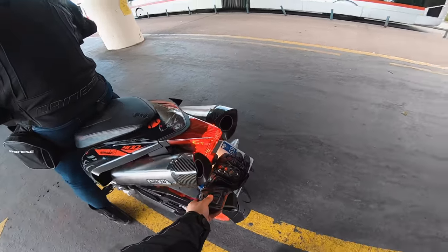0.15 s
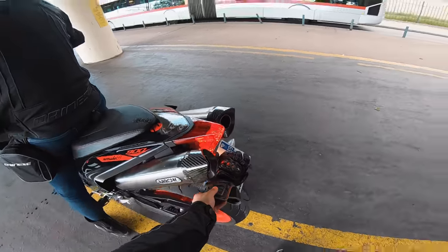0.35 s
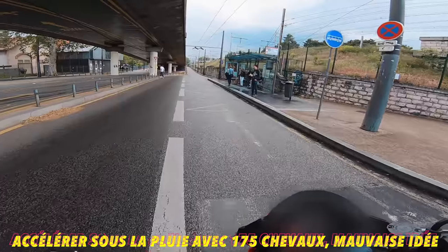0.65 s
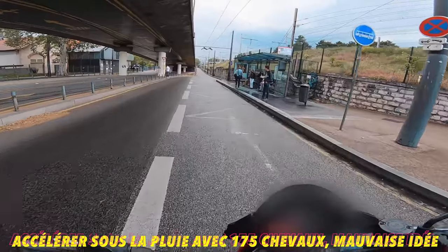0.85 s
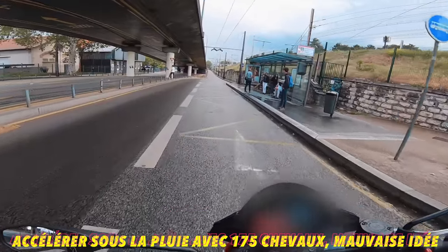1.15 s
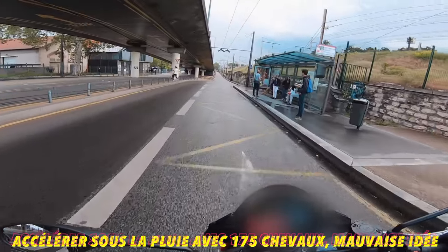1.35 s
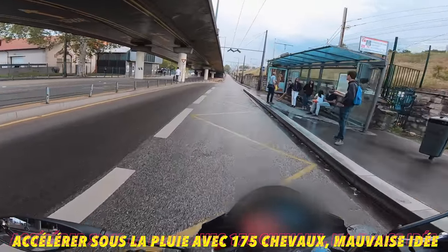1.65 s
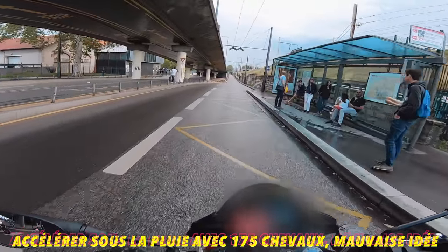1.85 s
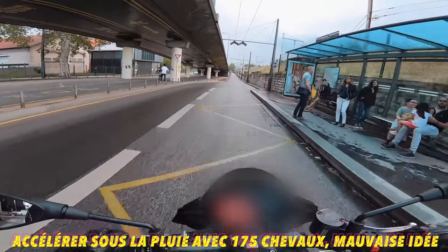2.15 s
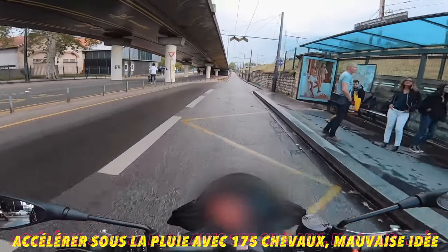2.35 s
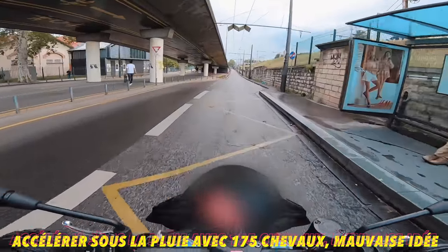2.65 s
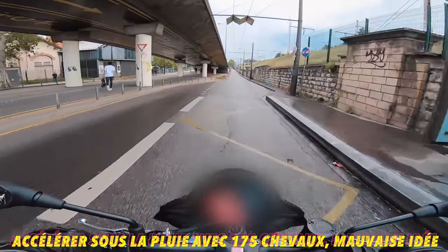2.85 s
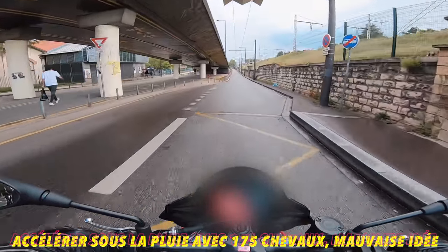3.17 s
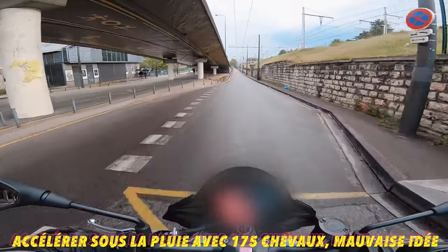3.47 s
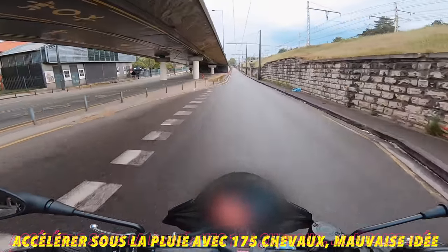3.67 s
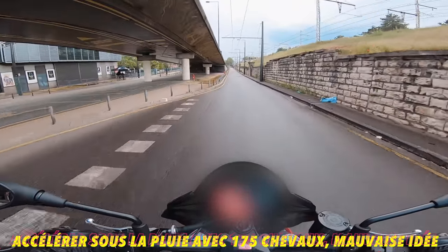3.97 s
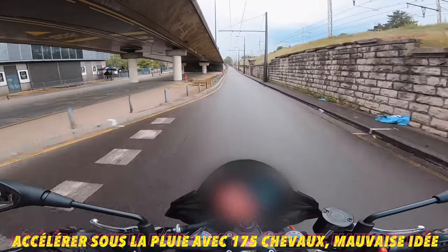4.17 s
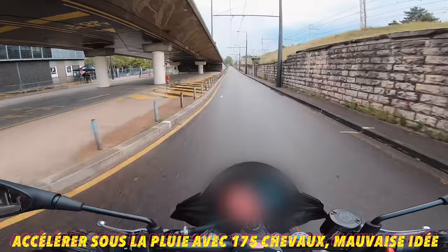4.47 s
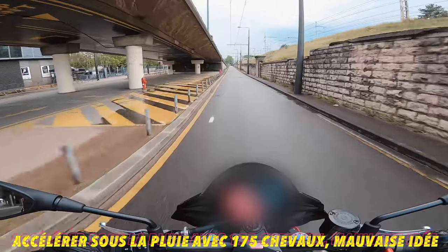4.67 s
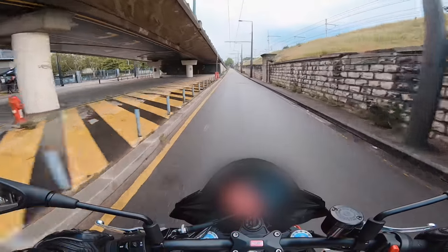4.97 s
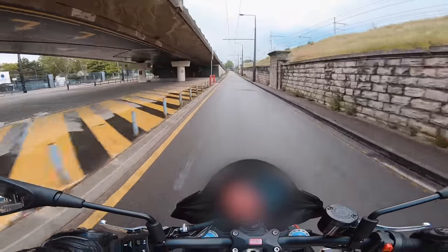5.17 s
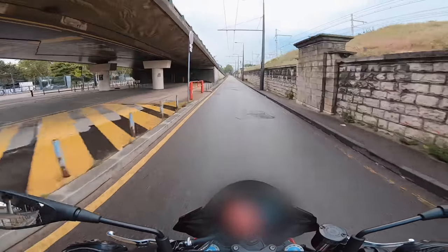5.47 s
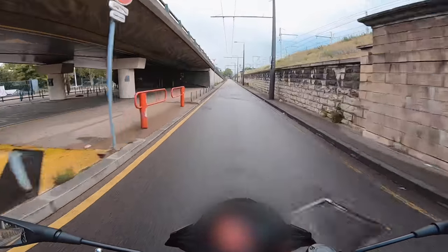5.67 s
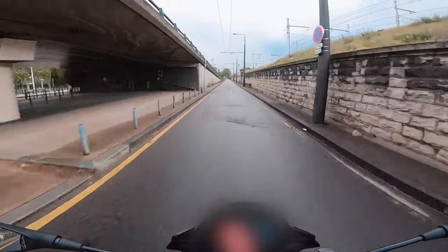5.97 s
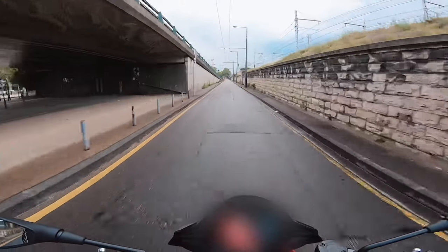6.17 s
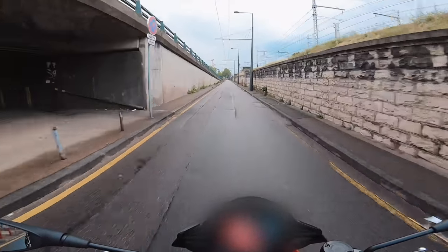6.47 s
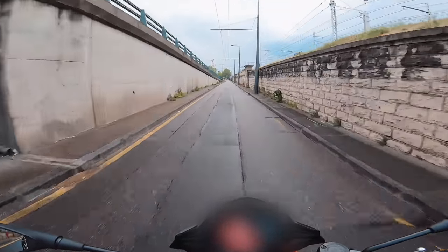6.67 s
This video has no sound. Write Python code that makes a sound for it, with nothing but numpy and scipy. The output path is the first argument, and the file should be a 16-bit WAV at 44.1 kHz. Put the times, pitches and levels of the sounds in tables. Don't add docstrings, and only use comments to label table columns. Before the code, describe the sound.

Lumpy idle thuds close to the silencers, with faint street noise, switch suddenly to a helmet microphone on a moving motorcycle. It putters gently until two seconds, then barks and pulls, intake gulps merging into a howl with whining gears. Revs leap at about five and a half seconds, drop, and the engine burbles on a shut throttle while wind rumbles and wet tyres hiss.

```python
import sys
import numpy as np
from scipy import signal
from scipy.fft import rfft, irfft, next_fast_len
from scipy.io import wavfile
from scipy.ndimage import uniform_filter1d, minimum_filter1d, map_coordinates

SR = 44100
rng = np.random.default_rng(int(sys.argv[2]) if len(sys.argv) > 2 else 0)


def how_loud(loudness_db):
    steps = np.asarray(loudness_db, float) / 20
    return 10 ** steps


def generate_wav(sig):
    pcm = np.round(np.clip(np.atleast_2d(sig).T, -1, 1) * 32767).astype(np.int16)
    wavfile.write(sys.argv[1], SR, pcm)


N = 300919
T = np.arange(N) / SR
MERGE_S = 3.69


def unit(x):
    return x / np.sqrt(np.mean(x ** 2) + 1e-20)


def steady(x, seconds):
    return x / np.sqrt(np.abs(uniform_filter1d(x ** 2, int(seconds * SR))) + 1e-12)


def curves(rows):
    s, *columns = np.transpose(rows)
    return [np.interp(T, s, column) for column in columns]


def wobble(rate):
    coarse = np.arange(0, N + 64, 64)
    knots = rng.standard_normal(int(N * rate / SR) + 4)
    return np.interp(np.arange(N), coarse, map_coordinates(knots, [coarse * rate / SR]))


def swells(rows):
    return sum(db * np.exp(-((T - s) / length) ** 2) for s, db, length in rows)


def gate(start, end, rise, fall):
    return np.clip(np.minimum((T - start) / rise, (end - T) / fall), 0, 1)


def filtered(x, response):
    m = next_fast_len(N + SR // 2)
    return irfft(rfft(x, m) * response(np.fft.rfftfreq(m, 1 / SR)), m)[:N]


def modes(table):
    return lambda f: sum((-1) ** k * how_loud(db) * 1j * f * w / (c * c - f * f + 1j * f * w)
                         for k, (c, w, db) in enumerate(table))


def noise(spectrum):
    hz, db = np.transpose(spectrum)
    colour = lambda f: how_loud(np.interp(np.log(f + 1), np.log(hz + 1), db))
    return unit(filtered(rng.standard_normal(N), colour))


def firings(cycles, angle, scatter_db, jitter):
    turn = np.arange(1, int(cycles[-1])) + angle
    chance = rng.standard_normal((len(turn), 2))
    at = np.interp(turn + jitter * chance[:, 0], cycles, np.arange(N))
    whole, size = at.astype(int), how_loud(scatter_db * chance[:, 1])
    part = at - whole
    clicks = np.bincount(whole, size * (1 - part), N + 1) + np.bincount(whole + 1, size * part, N + 1)
    return clicks[:N]


FIRING = np.array([0, .26, .52, .8])
STRENGTH = np.array([.8, .9, 1, .3])
# order (multiple of the cycle rate), level/dB, share of load felt, share of thrust felt
ORDERS = [(1, -28, 1.35, -0.05), (2, -26.5, -0.21, 0.4), (3, -13, 0.31, 0.74), (4, -24.5, -0.19, -0.1),
          (5, -21, 0.25, 0.65), (6, -47.5, -0.54, 0.1), (7, -41.5, 1.16, 0.24), (8, -39, 0.75, -0.29),
          (9, -51.5, 1.07, -0.042), (10, -62, 1.99, -0.36), (11, -41.5, 0.34, 0.53), (12, -42, 1.47, 0.08)]
# order, level/dB, share of load felt, share of thrust felt
HOWL = [(13, -53.5, 1.6, 0.0056), (14, -51, 1.4, 0.0033), (15, -49.5, 2.14, 0.018), (16, -41, 1.2, 0.0054)]
# f/Hz, width/Hz, level/dB
PIPES = [(49.9, 7.3, -3), (85.6, 4.8, -22.5), (150.7, 12, -3), (156, 27.6, -1.04), (198.6, 4.8, -4.5),
         (230, 20, 4.5), (263, 28, 7), (366.7, 34, 6.5), (400, 46, 9), (431, 9.4, 7.5), (587, 38, 6),
         (616, 30, 11.5), (717, 40, 1.5)]
# order, t/s, level/dB, length/s
TONE_SWELLS = [(1, 2.6, 5, .1), (10, 2.65, 13, .18), (9, 3.1, -8, 0.28), (10, 3.15, -7.5, .2), (9, 2.9, 3.5, .2),
               (11, 2.84, 1, 0.16), (12, 2.7, -9, 0.098), (4, 3.85, 6, 0.2), (2, 4.6, 6, .25),
               (11, 4.25, 2, 0.38), (8, 4.6, -6, 0.12), (3, 4.54, -6, 0.19), (6, 5.4, -1, .1),
               (9, 4.8, 0.5, 0.12), (11, 4.3, 15.5, 0.24), (5, 5.2, -5.5, .12), (13, 5.2, 19, .08),
               (9, 5.3, 8, 0.24), (8, 5.4, -9.5, 0.12), (5, 4.3, 1.5, 0.22), (9, 5.84, -11, .25),
               (7, 6.3, -5, .25), (5, 5.67, -4, 0.09), (4, 6.3, 2, 0.12), (3, 6.7, 2, .08), (11, 6.2, 12, .1),
               (14, 6.2, 8, .1), (12, 4.57, 3.5, 0.13), (13, 5.4, 3, .15), (12, 3.9, -4.5, 0.16),
               (11, 4.7, -3, .12), (5, 5.6, 4.5, 0.17), (2, 5.15, -4, .15), (9, 4.4, -5, .12), (3, 3.5, 3, .15),
               (6, 4, -4.5, .2), (8, 3.27, -4.5, .2), (7, 3.4, -2.5, .2)]


def orders(cycles, rate, load_db, thrust_db, merged):
    hz = np.arange(1., 1200)
    power = sum(np.abs(modes([pipe])(hz)) ** 2 for pipe in PIPES)
    pipes_db = 10 * np.log10(power / (1 + (hz / 793) ** 20))
    drift = .012 * wobble(12)
    out = 0
    for k, db, loaded, thrust in ORDERS + HOWL:
        level_db = db + loaded * load_db + thrust * thrust_db + np.interp(k * rate, hz, pipes_db)
        level_db = level_db + swells([swell[1:] for swell in TONE_SWELLS if swell[0] == k]) + 1.01 * wobble(17)
        phase = np.angle(np.sum(STRENGTH * np.exp(-2j * np.pi * k * FIRING)))
        heard = merged if k > 12 else 1
        out = out + np.sqrt(2) * heard * how_loud(level_db) * np.cos(2 * np.pi * k * (cycles + drift) + phase)
    return out


INTAKE = np.array([0, .31, .52, .72])
# t/s, cycles early
SLIP = [(0, .05), (2.05, .05), (2.16, -.06), (2.32, -.05), (2.5, .03), (2.85, .01), (3.4, .04), (3.5, .11),
        (3.62, .1), (3.71, -.03), (6.82, -.03)]
# t/s, share of each of the four, share of the upper tone
LEADS = [(0, 0.97, .5, .5, .5, .2), (2.1, 1, 0.28, 0.12, 0.31, 0.59), (2.33, 1, .25, 0.18, 0.28, 0.31),
         (2.4, 0.83, .3, .3, 0.67, 0.6), (2.58, 0.91, 0.31, .2, 0.79, 0.47),
         (2.66, 1, 0.5, .15, 0.39, 0.67), (2.85, 0.93, 0.34, 0.28, 0.49, 0.48),
         (2.89, 0.65, 0.98, 0.24, 0.58, 0.48), (3.08, 0.61, 1, 0.24, 0.46, .6),
         (3.12, .4, 0.49, 0.25, 0.89, 0.93), (3.3, 0.55, .5, 0.18, 1, 0.76),
         (3.4, 1, .25, .03, 0.056, 0.12), (3.69, 0.84, .25, 0.033, .05, 0.09),
         (3.76, 0.71, 0.93, 0.12, 0.8, 0.28), (6.82, 0.59, 0.97, 0.37, 0.96, 0.22)]
# f/Hz, width/Hz, level/dB
AIRBOX = [(386, 102, -0.5), (620, 119, 1), (707, 275, -4.5)]
# f/Hz, width/Hz, level/dB
AIRBOX_UPPER = [(419, 94, -3), (660.5, 131, 3.5), (746, 172, -3.5)]
# t/s, beats so far, share of the beat halfway
LOPE = [(0, -8.1, .8), (.704, 5, .8), (.87, 8, .7), (.98, 10, .25), (1.252, 15, .25), (1.513, 20, .3),
        (1.659, 23, .4), (1.884, 28, .3), (1.971, 30, .15), (2.091, 33, .15), (6.82, 155, .15)]


def airbox(cycles, rough, bark_db, rasp, merged):
    slipped = cycles + curves(SLIP)[0]
    trumpets = [firings(slipped, (a + .82) % 1, scatter_db=1, jitter=.002) for a in INTAKE]
    ring = lambda f: modes(AIRBOX)(f) ** 2 * modes([(635, 290, 0)])(f) ** 2
    lift = lambda f: modes(AIRBOX_UPPER)(f) ** 2 * modes([(660, 330, 0)])(f) ** 2
    *shares, upper = curves(LEADS)
    upper = np.clip(upper, 0, 1)
    drawn = sum(share * gulp for share, gulp in zip(shares, trumpets))
    gulps = (1 - upper) * unit(filtered(drawn, ring)) + upper * unit(filtered(drawn, lift))
    gulps = steady(gulps, 0.22)

    lope, halfway = curves(LOPE)
    clear = np.clip((T - 0.76) / 0.59, 0.3, 1)
    beats = firings(lope, 0, scatter_db=1, jitter=.01)
    beats = unit(beats + halfway * firings(lope, .5, scatter_db=1.5, jitter=.03))
    puffs = 1 + 0.28 * clear * unit(filtered(beats, lambda f: (f > 5) / (1 + 1j * f / 30) ** 2))
    putter = unit(filtered(beats, modes([(629, 120, -1.5), (748, 90, -2), (474, 90, -3)]))) / 6
    shut = np.clip((.2 - rasp) / .1, 0, 1)
    rush = rng.standard_normal(N) * (.66 * np.abs(puffs)) ** shut
    swirl = steady(filtered(rush + 1.15 * clear * shut * putter, ring), .2)
    clean = np.sqrt(1 - rough) * how_loud(-10.5 * merged) * gulps
    return how_loud(bark_db - 0.17) * (clean + np.sqrt(rough) * swirl)


# f/Hz, width/Hz, level/dB
HOUSING_SLOW = [(1248, 155, -3.5), (1533, 194, 3), (2010, 1190, -4.5), (2620, 700, -5.5), (2940, 91, -12),
                (3155, 96, -13), (3650, 430, -24.5), (4800, 220, -15), (5330, 200, -22), (6260, 400, -27)]
# f/Hz, width/Hz, level/dB
HOUSING_FAST = [(1229, 310, -5), (1396, 144, 2), (1627, 528, -5.5), (2212, 95, -2.5), (2387, 100, -4),
                (3220, 960, -15), (3663, 325, -13.5), (4910, 535, -18), (5330, 540, -18), (6390, 400, -30)]


def housing(cycles, level_db, rasp, load_db):
    ticks = sum(firings(cycles, a + .1, scatter_db=1.8, jitter=.0025) for a in FIRING)
    pulsing = 6.1 + unit(filtered(ticks, lambda f: 1 / (1 + 1j * f / 60)))
    rush = unit(pulsing * how_loud(0.49 * wobble(20)) * rng.standard_normal(N))
    band = lambda f: (f > 700) / (1 + (f / 2700) ** 6)
    blunt = steady(filtered(ticks, band), .1) * np.sqrt(2000 / (SR / 2))
    drive = rush + (np.sqrt(1 - rasp) - 1) * filtered(rush, band)
    drive = drive + np.sqrt(rasp) * (blunt + how_loud(-20) * gears(cycles, load_db))
    fast = np.clip((T - 1.3) / 0.63, 0, 1)
    crawl, cruise = [unit(filtered(drive, lambda f: modes(table)(f) / (1 + (f / 6300) ** 8)))
                     for table in (HOUSING_SLOW, HOUSING_FAST)]
    return how_loud(level_db) * flared(steady((1 - fast) * crawl + fast * cruise, 0.28))


# order, level/dB, share of load felt
GEARS = [(17, 0, -0.068), (18, -6.5, 0.87), (20, -5.5, 0.23), (22, -4.5, -0.22), (24, -1.5, 0.13),
         (27, -1, 0.38), (34, -2, -0.6), (25, -11.5, -0.026), (23, -5, 0.099), (30, -2.5, -0.25),
         (31, -9, -0.092), (32, -5.5, .2), (35, -8.5, -0.02), (36, -2.5, .2), (38, -4.5, -0.073),
         (40, -2, .1)]
# order, t/s, level/dB, length/s
MESHES = [(34, 5.87, 7.5, .2), (34, 6.25, 10, .15), (35, 6.3, 11, .2), (36, 6.4, 5, .15),
          (40, 6.4, 9.5, .15), (24, 7.6, 6, .12), (30, 5.9, 3, .15), (31, 6.2, 7, .12), (23, 5.2, 9, .15),
          (22, 5.12, -7.5, .18), (23, 5.1, -6, .15), (17, 4.9, -6, .15), (18, 5.2, 8, .08),
          (27, 5.15, -4, .15), (30, 4.6, 7, .15), (32, 4.4, 5.5, .2), (32, 4.95, 4.5, 0.13),
          (36, 4, 7, .15), (38, 5.6, 9.5, .2), (34, 4.9, 6, .15), (20, 6.2, 5.5, .3), (22, 6.3, 1, .3),
          (40, 5.9, 4, .15), (38, 8, 6, .2)]


def gears(cycles, load_db):
    pull_db = np.clip(load_db, -4, 9)
    shaft = 2 * np.pi * (cycles + 0.007 * wobble(25))
    out = 0
    for k, db, loaded in GEARS:
        level_db = db + loaded * pull_db + 5.5 * wobble(9)
        level_db = level_db + swells([mesh[1:] for mesh in MESHES if mesh[0] == k])
        out = out + how_loud(level_db) * np.sin(k * shaft)
    return out


# f/Hz, width/Hz, t/s, length/s, level/dB
FLARES = [(1370, 73, 3.3, 0.45, 3.5), (1330, 100, 2.4, .15, 5), (1300, 90, 2.7, 0.13, 3),
          (1280, 130, 3.3, 0.13, 3), (1210, 80, 3, 0.15, -1), (1700, 100, 3.5, .15, 3),
          (2170, 90, 5.3, .15, 4.5), (2420, 90, 3.3, 0.11, 5), (2400, 370, 2.4, 0.28, 0.5),
          (3200, 110, 2.96, .18, 8.5), (3180, 100, 0.64, 0.22, 6), (3800, 150, 4.85, .2, 4),
          (3750, 100, 8.1, .3, 18.5), (2950, 100, 7.8, .2, 3), (4900, 120, 2.3, .2, 6),
          (5400, 180, 2.9, 0.43, 6.5), (4950, 120, 3.3, .15, 4), (5000, 100, 4.3, .5, 0),
          (6300, 400, 3.6, 1.1, -4.5), (5100, 400, 5.6, .5, -1), (4000, 300, 1.2, .4, -1.5),
          (5370, 120, 1.05, .12, 2), (1450, 90, 6.7, 0.1, 0.5), (1580, 120, 4.8, 0.13, 0),
          (2470, 90, 4.4, 0.18, 0)]


def flared(x):
    hz, t, z = signal.stft(x, SR, nperseg=1024)
    field_db = sum(db * np.outer(np.exp(-((hz - c) / w) ** 2), np.exp(-((t - s) / length) ** 2))
                   for c, w, s, length, db in FLARES)
    return signal.istft(z * how_loud(field_db), SR, nperseg=1024)[1][:N]


STUMBLES = {2: 5.6, 5: 7.9, 6: 3, 9: 22, 13: 4.3, 15: 8.2}
# f/Hz, width/Hz, level/dB
SILENCER = [(72, 22, -4.5), (128, 48, 6), (220, 62, -3), (374, 69, -8)]
# f/Hz, level/dB per Hz
IDLE_AIR = [(15, -36), (25, 2), (107, -11.5), (204, -3.5), (289, -32), (389, -12), (445, -25.5), (945, -33),
            (1170, -46), (2230, -48), (15500, -89)]


def idle():
    thumps, cracks = np.zeros(N), np.zeros(N)
    for number, scatter in enumerate(rng.standard_normal(16)):
        turn = number // 2 + .395 * (number % 2)
        s = .0047 + .04845 * turn + .00197 * turn ** 2
        loss_db = STUMBLES.get(number, 0)
        thumps[round((s + .0019) * SR)] = -how_loud(34 - loss_db)
        cracks[round((s + .004) * SR)] = -how_loud(1.5 - loss_db + 3 * scatter)
    push = lambda f: sum(how_loud(db) * c * w / (c * c - f * f + 1j * f * w) for c, w, db in SILENCER)
    soft = lambda f: 1 / (1 + 1j * f / 1000) ** 4 * 1150 ** 2 / (1150 ** 2 - f * f + 1.3j * f * 1150)
    thump = filtered(thumps, lambda f: push(f) * soft(f) * 1j * f / (70 + 1j * f))
    crack = filtered(cracks, lambda f: modes([(800, 480, 0)])(f) ** 4)
    jets = filtered(-thumps, lambda f: 1 / (1 + 1j * f / 220) ** 2)
    puffs = how_loud(-65) * jets / jets.max() * noise([(7000, -39), (9500, 0), (15500, -4), (16500, -52)])
    echo = filtered(-thumps, lambda f: 1 / (1 + 1j * f / 9) / (1 + 1j * f / 40))
    street = how_loud(-22.5 + 1.3 * wobble(40)) * (0.59 + 0.94 * echo / echo.max()) * noise(IDLE_AIR)
    return thump + crack + street + puffs


# f/Hz, width/Hz, level/dB
BURBLE = [(217.6, 83, -1), (340, 120, 5.5), (429, 120, -4.5)]
# t/s, level/dB, length/s
LULLS = [
    (5.68, -4, 0.09),
    (6.15, 3, 0.17),
    (6.4, 2.5, .1),
]


def burble(rough):
    low, high, upper = [how_loud(db) * unit(filtered(rng.standard_normal(N), lambda f: modes([(hz, w, 0)])(f) ** 2))
                        for hz, w, db in BURBLE]
    chambers = np.where(T < 4, low + upper, high)
    return rough * how_loud(-30 + swells(LULLS) + 1.4 * wobble(13)) * chambers


# f/Hz, level/dB per Hz
SIZZLE = [(4500, -31), (5500, 1), (6500, 5), (8000, -10), (8600, -28.5)]
# from t/s, to t/s, rise/s, fall/s
SIZZLE_S = (1.4, 2.45, .9, .02)


def clutch():
    return gate(*SIZZLE_S) * how_loud(-58) * noise(SIZZLE)


# f/Hz, level/dB per Hz
BUFFET = [(5, -14), (15, 12), (31, 0.5), (45, -7), (70, -9.5), (140, -7.5), (400, -61.5)]
# t/s, level/dB, length/s
GUSTS = [(.92, 1, 0.087), (1.25, 0, 0.18), (2.62, 8, .08), (3.12, 8, 0.17), (3.4, 3.5, 0.14),
         (4.3, -1, 0.22), (4.7, -4, 0.12), (4.98, 3, 0.14), (5.3, 10, 0.043), (5.55, 1.5, 0.049),
         (5.8, 7, 0.041), (6.15, 0.5, 0.027), (6.4, 4, .06), (3.58, 4, 0.065)]


def wind():
    level_db = -31.5 + 1.5 * T + swells(GUSTS) + 3 * wobble(9.8)
    return how_loud(level_db) * unit(how_loud(1.5 * wobble(6)) * noise(BUFFET))


# f/Hz, level/dB per Hz
ROAR = [(24, -37), (40, 3), (162, -6), (239, -8), (275, -9.5), (472, -14), (573, -17), (1100, -26.5),
        (1430, -60), (2420, -120)]


def tyres(flow_db, rough):
    level_db = -27.5 + 1.25 * T + 0.11 * flow_db + 1.5 * wobble(5.09)
    level_db = level_db - 1.5 * (T > MERGE_S) * (1 - rough)
    return how_loud(level_db) * unit(how_loud(1.7 * wobble(22)) * noise(ROAR))


# f/Hz, level/dB per Hz
SPRAY = [(3410, -20.5), (5800, -4), (6310, -2), (7460, -13.5), (9320, -15), (11900, -13.5), (15100, -20),
         (15800, -34)]
# t/s, level/dB over the steady spray, length/s
PUDDLES = [
    (2.6, 3, 0.23),
    (3.05, 3, 0.33),
    (4.9, 2, .15),
    (3.9, 2.5, 0.088),
    (5.35, 1.5, 0.059),
    (6.0, 4, 0.76),
]
# f/Hz, level/dB per Hz
MIST = [(8600, -29), (9400, -3), (12500, -4.5), (14500, 0), (15700, -2), (16000, -31)]
# from t/s, to t/s, rise/s, fall/s
MIST_S = (.57, 1.07, .06, .06)


def spray(flow_db):
    level_db = -66 + 1.79 * T + 0.56 * flow_db + swells(PUDDLES)
    spikes = how_loud(.8 * wobble(24) + .6 * wobble(60) + .9 * wobble(150))
    drizzle = gate(*MIST_S) * how_loud(-67) * noise(MIST)
    return how_loud(level_db) * unit(spikes * noise(SPRAY)) + drizzle


# t/s, cycles a second
SPEED = [(0.0, 25.53), (1.415, 26.71), (2.065, 26.5), (2.545, 29.99), (3.402, 39.41), (3.661, 43.1),
         (4.102, 50.93), (4.236, 53.8), (4.997, 68.44), (5.239, 75.61), (5.375, 89.69), (5.42, 86.51),
         (5.49, 72.34), (5.53, 69.9), (5.67, 73.8), (5.972, 69.88), (6.048, 70.45), (6.82, 63.29)]
# t/s, turbulence share 0-1, clean rasp share 0-1
THROTTLE = [(.48, .97, .1), (2.03, .95, .1), (2.08, .12, .2), (2.45, .4, .2), (2.64, .07, .3),
            (2.87, .07, .3), (2.92, .2, .3), (3.3, .18, .3), (3.4, .03, .25), (3.69, .03, .3),
            (3.76, .07, .4), (4.6, .07, .5), (5.25, .07, .65), (5.38, .1, .6), (5.5, .9, .22),
            (6.82, .9, .22)]
# t/s, intake load level/dB, exhaust thrust level/dB, airbox bark level/dB
EFFORT = [(.48, -27, 11, -31), (1.0, -26, 12, -29), (1.5, -24.5, 10.5, -27), (1.9, -17, 4.5, -23),
          (1.98, -17, -2, -21), (2.13, 7, 5, -18), (2.37, 7, 1, -21.5), (2.47, 0, -8.5, -28),
          (2.65, 3.5, -5, -18), (2.88, 3, -2, -19), (2.95, 0, -2, -21.5), (3.15, 6, -7, -18.5),
          (3.36, 4, -14.5, -19.5), (3.43, 4.5, -16, -17), (3.66, 3.5, -7.5, -16.5), (3.76, 7, -4.5, -19),
          (4.2, 7.5, -22.5, -12.5), (4.45, 9.5, -14.5, -15), (4.7, 10, -11, -13.5), (4.95, 10.5, -13, -19),
          (5.12, 11, -13, -18.5), (5.27, 12.5, -14, -30), (5.35, 1.5, -12.5, -25), (5.43, -6, -26, -35),
          (5.62, -5, -14.5, -36), (5.85, 0.5, -17.5, -42), (6.1, 0, -22.5, -40), (6.28, 0, -11.5, -35),
          (6.45, -2, -5.5, -37), (6.82, -6, -19, -43)]
# t/s, level/dB at the housing
AIRFLOW = [(0.49, -40.5), (0.54, -38), (2.0, -32.5), (2.02, -30.5), (3.35, -29), (3.63, -31.5),
           (3.98, -26.5), (4.14, -31.5), (4.79, -28), (4.85, -25.5), (4.93, -26.5), (5.37, -28),
           (5.48, -31), (6.13, -27.5), (6.54, -30.5), (6.82, -28.5)]


def scene():
    rate, = curves(SPEED)
    cycles = np.cumsum(rate) / SR
    rough, rasp = curves(THROTTLE)
    load_db, thrust_db, bark_db = curves(EFFORT)
    flow_db, = curves(AIRFLOW)
    over_db = flow_db + 31
    merged = np.clip((T - MERGE_S) / 0.035, 0, 1)
    ride = orders(cycles, rate, load_db, thrust_db, merged)
    ride = ride + airbox(cycles, rough, bark_db, rasp, merged)
    ride = ride + housing(cycles, flow_db, rasp, load_db)
    ride = ride + burble(rough) + clutch()
    ride = ride + wind() + tyres(over_db, rough) + spray(over_db)
    riding = np.clip((T - .481) / 0.0033, 0, 1)
    ends = np.clip(np.minimum(np.arange(N), np.arange(N, 0, -1)) / (.002 * SR), 0, 1)
    return (ends * ((1 - riding) * idle() + riding * ride))[None]


def top_cut(x):
    return signal.sosfilt(signal.butter(12, 15950, fs=SR, output="sos"), x)


def record(dry):
    limit, span = .76, int(.006 * SR)
    need = np.minimum(1, limit / (np.abs(dry) + 1e-9))
    held = dry * uniform_filter1d(minimum_filter1d(need, 2 * span + 1), span)
    held = filtered(held[0], lambda f: f < 15720)[None]
    return top_cut(held)


dry = scene()
out = record(dry)
generate_wav(out)
```